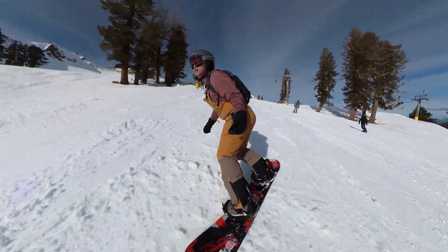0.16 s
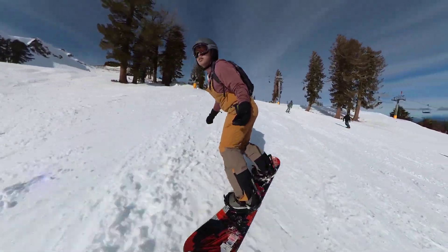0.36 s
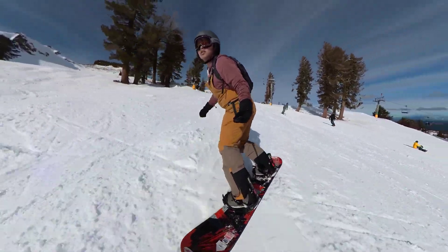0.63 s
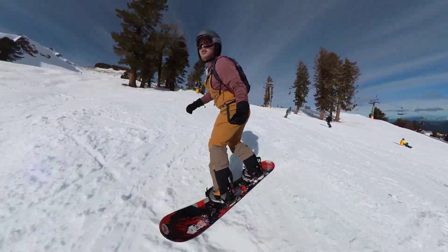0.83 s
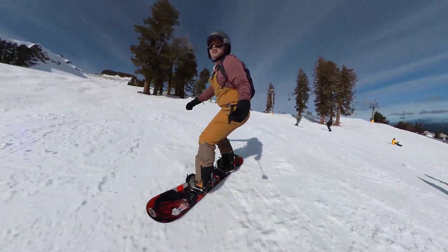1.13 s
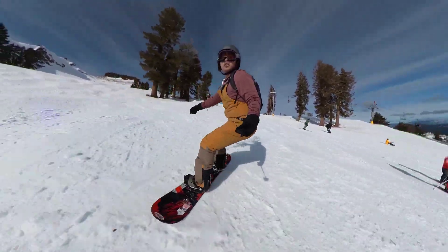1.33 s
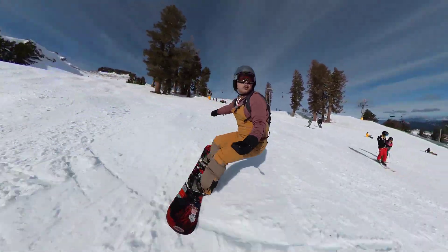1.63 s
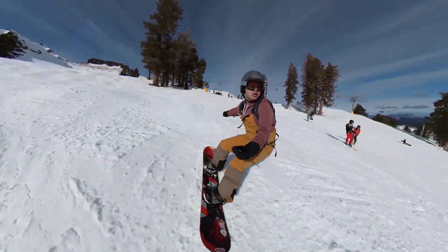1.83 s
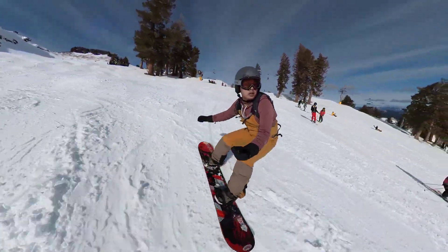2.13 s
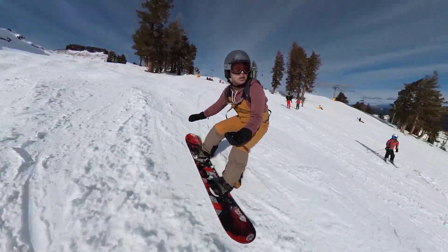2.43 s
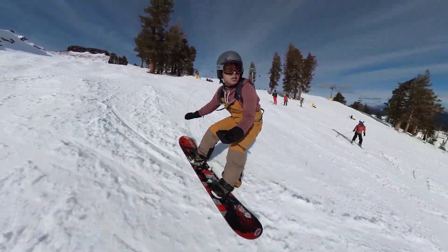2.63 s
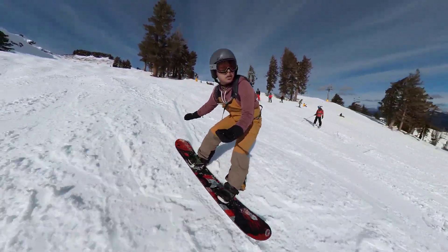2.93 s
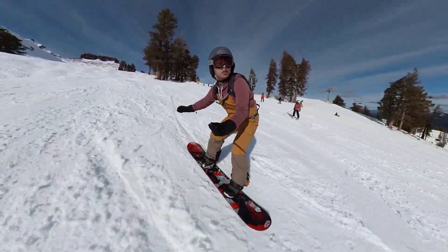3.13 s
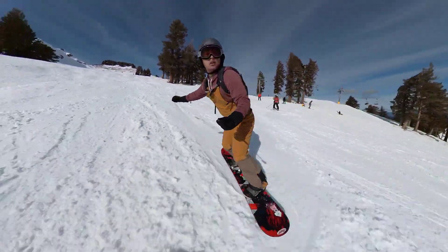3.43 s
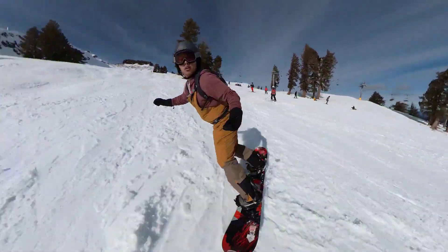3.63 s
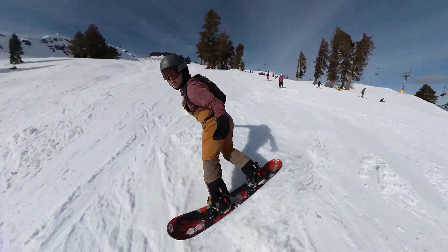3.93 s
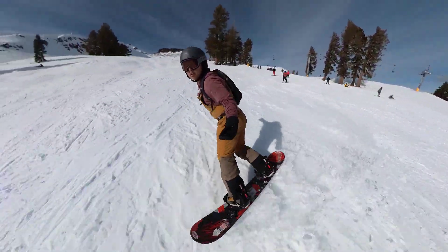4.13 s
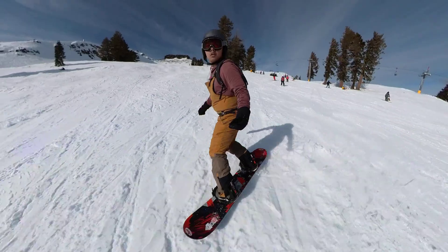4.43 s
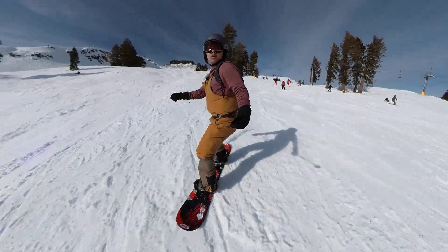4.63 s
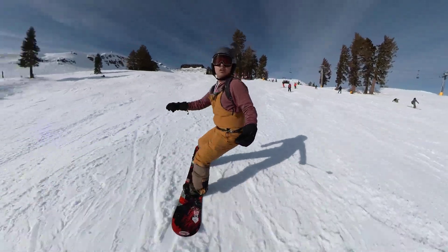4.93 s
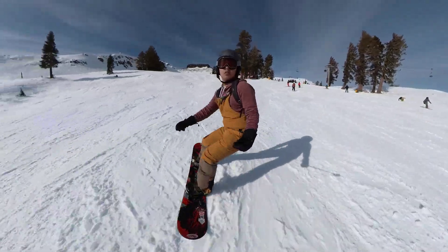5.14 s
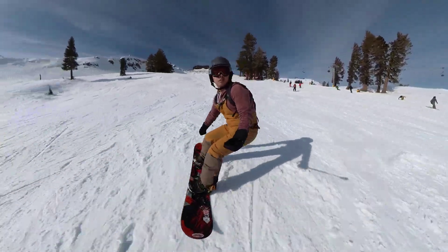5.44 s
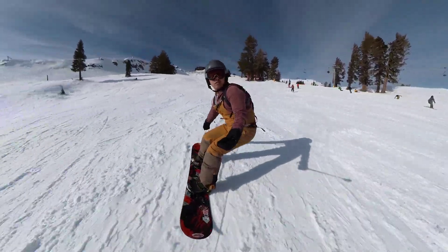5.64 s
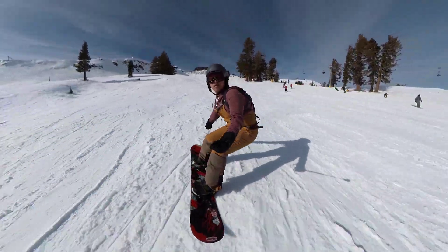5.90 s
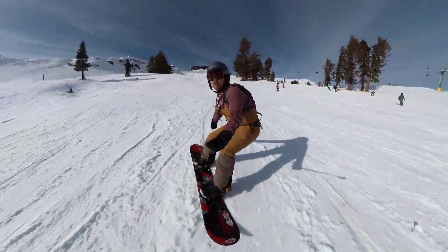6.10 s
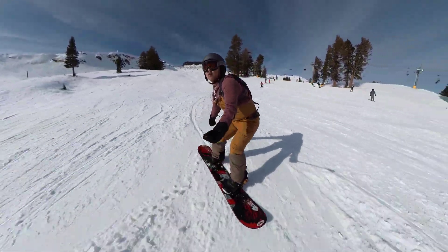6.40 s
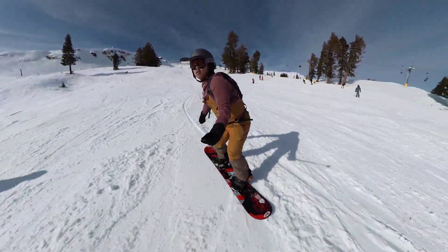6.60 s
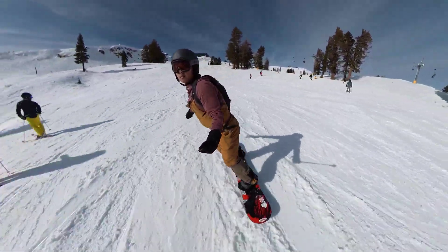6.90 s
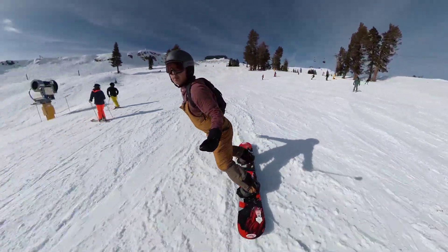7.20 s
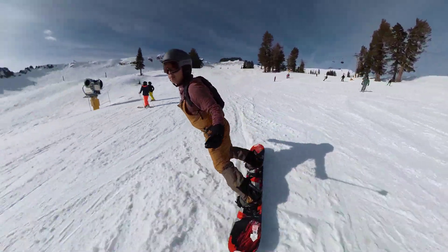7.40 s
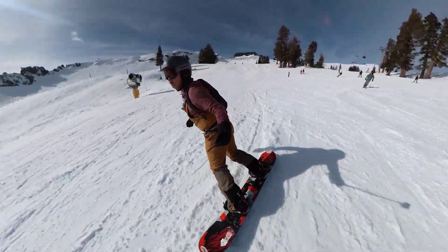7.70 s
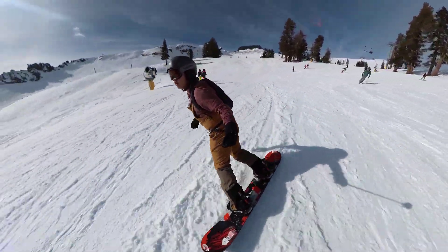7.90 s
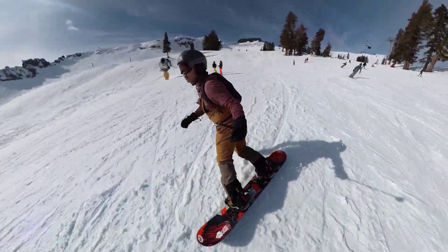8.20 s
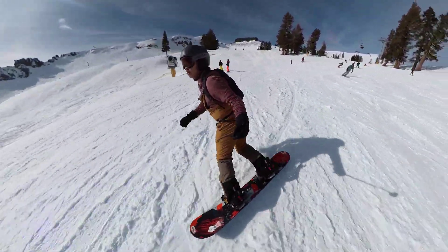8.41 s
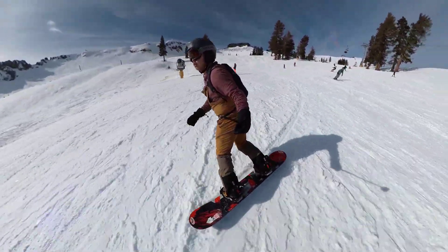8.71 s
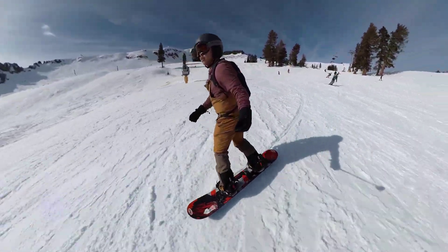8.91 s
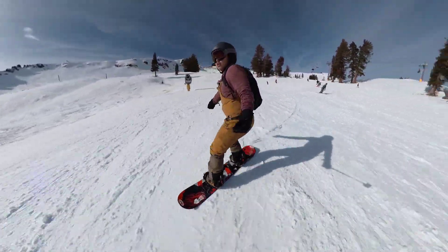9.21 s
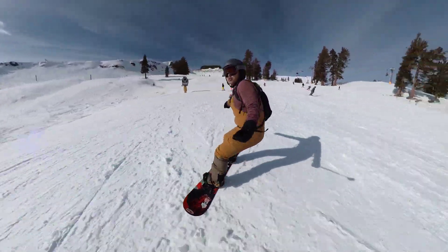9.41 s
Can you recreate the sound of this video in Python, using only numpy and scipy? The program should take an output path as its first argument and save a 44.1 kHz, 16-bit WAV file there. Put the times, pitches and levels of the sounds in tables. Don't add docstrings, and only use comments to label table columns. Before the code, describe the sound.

Bright icy hiss of a snowboard edge carving packed snow, with wind gusts buffeting a close microphone and a few small dull knocks.

```python
import sys
import numpy as np
from scipy import signal
from scipy.fft import rfft, irfft, next_fast_len
from scipy.io import wavfile
from scipy.ndimage import uniform_filter1d, minimum_filter1d

SR = 44100
rng = np.random.default_rng(int(sys.argv[2]) if len(sys.argv) > 2 else 0)


def makeup_ratio(level_db):
    decades = np.asarray(level_db, float) / 20
    return 10 ** decades


def generate_wav(signal):
    frames = np.transpose(np.atleast_2d(signal))
    scaled = np.clip(frames, -1, 1) * 32767
    pcm = np.round(scaled).astype(np.int16)
    wavfile.write(sys.argv[1], SR, pcm)


N = 421155
TIME = np.arange(N) / SR
CLOCK = np.arange(0, N / SR + .002, .001)
HZ = np.fft.rfftfreq(next_fast_len(N), 1 / SR)

# frequency in Hz, density in dB per Hz.
SCRAPE_COLOUR = [(1100, -7), (1800, 1.5), (3000, 0), (5000, 0.5), (8000, 0), (9500, -21.5), (16000, -48)]
LOW_PORT_COLOUR = [(7200, -30.5), (8800, -5), (10300, 2), (11100, 1.5), (12000, -12), (13000, -38)]
MID_PORT_COLOUR = [(10000, -28), (11400, 5.5), (12600, 6.5), (14000, -15)]
HIGH_PORT_COLOUR = [(11800, -22), (12800, 0), (13600, 9), (14500, 7), (15900, 9), (16000, -36)]

# time in seconds, pressure in dB, port gleam in dB,
# port facing the spray (0 low ring, 1 middle, 2 high, 3 low again), board drone in dB.
RIDE = [(0.1, -49.5, 14.2, 1.45, 2), (0.36, -47, 11, 2, -3.1), (1.2, -49.5, 11.5, 2.4, 4),
        (1.6, -48.5, 5.5, 3, 2), (2.3, -49, -2, 2.4, -4), (3.66, -55.5, 11.5, 1.3, -2.5),
        (3.97, -55, 9, 1.3, -2), (4.55, -45.5, 5.5, 1.4, -1), (4.72, -53, 5.5, 0.1, -2.5),
        (5.5, -48, 4, -.4, 3.5), (6.05, -43.5, 6.5, .7, -0.8), (6.33, -51, .5, -0.4, 3.5),
        (6.85, -57.5, 3.5, -.4, -3), (7.35, -51, 2, -0.6, 0), (7.98, -49.5, 7.4, 1, -1),
        (8.78, -47, 5, 1.7, 3.5), (9.1, -56.5, 10.5, 1.54, 6.5), (9.55, -56.5, 6, 1.3, 1)]
# start in seconds, hold in seconds, pressure in dB, gleam
# in dB, facing 0-3.
BITES = [(0.0, 0.033, -41, 6, 0.36), (2.55, 0.47, -54.5, 7.5, 1.2), (1.002, 0.072, -46, 14.5, 2.6),
         (1.19, 0.084, -56.5, 17.5, 2.3), (1.446, 0.066, -52.5, 17.5, 0.084), (1.689, 0.057, -43, -1, 1.6),
         (1.753, 0.13, -43.5, 9, 0.45), (2.12, 0.08, -46, -1, 2.7), (2.294, 0.055, -45, -20, 0.33),
         (2.57, 0.089, -48.5, -10, 1.4), (3.083, 0.051, -46.5, -21, 0.91), (3.7, 0.21, -57, 20.5, 1.7),
         (5.105, 0.036, -51.5, 12.5, 2.5), (5.226, 0.028, -49, 10, 2.7), (5.52, 0.12, -62, 15, 1.8),
         (7.0, 0.11, -57, -8, 2.9), (7.557, 0.23, -48, 5.5, 0.33), (7.77, 0.072, -47, 0.5, 0.27),
         (8.067, 0.039, -47, 4, 1.5), (8.376, 0.058, -46.5, -4, 1.6), (9.184, 0.097, -56.5, 9, 1.9),
         (6.2, .3, -58, 14, 2.1), (5.66, .28, -56, 15, 1.3), (3.82, .12, -56, 16, .5),
         (1.93, .02, -54, 11, 2.3), (1.97, .08, -62, 17, 2.1), (4.705, .015, -53, 6, .3),
         (4.81, .015, -49, 3, .1), (5.0, .07, -51, 2, .3), (5.36, .02, -54, 13, 1),
         (7.11, .14, -62, 13, 2.1), (6.44, .07, -55, -4, 2.5), (1.33, .02, -51, 10, 2.5),
         (1.25, .03, -58, 18, .4), (7.45, .45, -60, 14, 1.7), (6.67, .08, -60, 4, 2.9),
         (1.1, .06, -58, 17, 1.6)]
# start in seconds, hold in seconds, pressure in dB,
# gleam in dB, facing 0-3.
CARVES = [
    (.375, 0.09, -45, 9, 0.1),
    (.48, .29, -42.5, 11.5, .4),
    (.8, .16, -42.5, 10.5, .4),
    (3.975, .012, -54, 14, .9),
    (3.989, 0.04, -45, 12, 0),
    (4.04, .22, -43, 9.5, .1),
    (4.3, .2, -44, 6.5, .2),
    (4.52, .07, -49, 5, .1),
    (2.41, .14, -57, 9, 1.3),
    (3.67, .06, -62, 22, 1.8),
]
# time in seconds, peak in dB.
ICE_LUMPS = [(0.3531, -33), (1.068, -48), (1.4386, -39), (1.697, -37), (2.575, -38), (3.1268, -44),
             (3.9903, -38), (4.9082, -46), (5.1113, -43), (5.246, -38), (5.69, -36.5), (5.9828, -36),
             (7.2674, -37), (7.3756, -43), (7.5482, -37), (7.7258, -42), (8.0755, -36), (9.4805, -52)]
BITE_RISE_S, BITE_RISE_DB, BITE_FALL_DB_PER_S = 0.022, 30, 256
LUMP_DB, LUMP_HOLD_S, LUMP_GLEAM_DB, LUMP_FACING = -10, 0.004, -4, 0.91
# level in dB of the low, middle, high ring.
PORT_DB = [1, -1, 0]
OFF_PORT_DB = 8.5
DRONE_DB = [-22, -16, -10.5, -10]

# frequency in Hz, side level in dB, share of time apart 0-1.
WIDTH = [(2850, -8.5, .8), (6000, -2.5, 1), (8940, -1, 0.3), (10000, -3.5, 0.7), (11200, -10.5, .8),
         (13400, 0, .9), (16000, -21, 1)]
# start in seconds, end in seconds, low edge in Hz, high edge in Hz,
# share of time apart 0-1.
NARROW_SPELLS = [
    (.45, 1.2, 8300, 10400, 0),
    (1.3, 1.9, 9000, 12500, .5),
    (2.4, 3.7, 12800, 16000, .3),
    (3.7, 4.3, 9000, 12500, .3),
    (4.75, 5.4, 9600, 10700, .1),
    (5.25, 5.42, 8300, 11500, 0),
    (7.2, 7.7, 8300, 10500, .2),
]
MONO_BELOW_HZ = 2950

# frequency in Hz,
# density in dB per Hz.
RUMBLE_COLOUR = [(30, -42), (50, -12), (75, -2), (100, -1.5), (130, -1), (170, -1.5), (240, -24)]
FLUTTER_COLOUR = [(120, -0.5), (180, -0.5), (280, -1), (440, -12.5), (620, -19)]
RASP_COLOUR = [(320, -4), (460, 0.5), (650, 3.5), (880, -4), (1200, -12.5)]
WHISK_COLOUR = [(650, -26), (920, -6), (1400, -6.5), (1600, -14), (2400, -19), (3600, -34)]
LIGHT_AIR_COLOUR = [(55, -19.5), (88, -12.5), (100, -14), (109, -5.5), (120, -10.5), (145, -11.5),
                    (190, -18)]
LAYER_OCTAVES = np.array([[0], [1], [2.3], [3.3]])
# time in seconds, level in dB, pitch in octaves above the rumble.
BREEZE = [(0.0, -46.5, .8), (0.34, -43, 1.1), (0.38, -63, 0.6), (0.9, -78, 1.4), (1.46, -69, 0.62),
          (1.6, -53, 0.68), (2.05, -54.5, -0.0033), (4.0, -47.5, 0.48), (4.5, -44.5, 0.5),
          (4.66, -52, 0.24), (5.7, -53, 0), (6.5, -56.5, -.4), (6.9, -46, -.8), (7.65, -47, 0.39),
          (8.3, -47.5, 0.9), (8.9, -47, 0.8), (9.12, -46.5, 0.46), (9.55, -42.5, 0.15)]
# start in seconds, rise in seconds, hold in seconds, level in dB,
# pitch in octaves above the rumble.
GUSTS = [(2.03, 0.22, .085, -33.5, 1.7), (2.22, .03, .12, -38, 2), (2.3, .03, .07, -38, -.2),
         (2.361, .02, .12, -38, 1.16), (2.5, 0.028, 0.13, -33, 0.22), (2.606, 0.021, 0.35, -30.5, 0.55),
         (2.97, 0.015, 0.42, -36, -0.26), (3.159, 0.039, 0.54, -27.5, 0.6), (3.737, .02, 0.19, -30, 0.3),
         (3.905, 0.03, 0.035, -28.5, 2.8), (3.984, .02, 0.074, -40, 0), (4.18, .08, 0.18, -35, 0.88),
         (5.06, 0.038, 0.19, -35.5, 0.2), (5.4, 0.055, 0.19, -48.5, 1.7), (4.417, 0.018, 0.04, -41, .5),
         (4.53, .02, .09, -52, 3), (6.552, 0.027, 0.222, -45.5, -1.1), (6.82, 0.081, 0.44, -39.5, -0.18),
         (7.147, 0.1, 0.32, -32.5, 1.54), (7.748, .11, 0.071, -31, 2), (8.354, 0.025, .04, -48, 0.5),
         (6.03, 0.045, 0.21, -48.5, -.3), (9.294, 0.044, 0.072, -45.5, 1.45), (9.492, 0.048, .05, -44, 2.8),
         (2.278, 0.04, 0.052, -29.5, 3.5), (7.355, 0.022, 0.044, -30.5, 6),
         (1.486, 0.013, 0.019, -40, 0.95), (6.98, .05, .08, -53, 2.3), (9.3, .03, .06, -44, -.4),
         (.68, .02, .07, -58, -.3), (6.66, .05, .2, -54, .7), (5.3, .03, .17, -47, .2),
         (5.5, .03, .16, -50, -.3)]
# middle in seconds, peak in dB, pitch in octaves above the rumble.
PUFFS = [(3.78, -41, .6), (2.42, -34, 0.81), (2.445, -24.5, 0.21), (2.524, -29, .9), (2.645, -23.5, 0.14),
         (2.68, -33, .6), (2.78, -27, .8), (2.81, -20.5, 0.67), (2.85, -36, 0.81), (2.91, -30.5, 0.93),
         (2.965, -31, 0.64), (3.14, -26, 0.93), (3.22, -21, 0.34), (3.32, -37, .1), (3.35, -31, 1.7),
         (3.43, -27, 0.28), (3.48, -31, 0.5), (3.54, -24, 0.4), (3.635, -20.5, 1.3), (3.69, -29, .1),
         (3.721, -23, .9), (3.901, -21.5, 0.33), (4.26, -30, 1.1), (4.31, -24.5, 0.73), (5.17, -44, .4),
         (5.25, -36, 0.87), (7.289, -30, 3.5), (7.385, -28, 3.1), (7.45, -20, 0.27), (7.513, -30, 3),
         (3.3, -25, .2), (3.26, -28, .5), (3.375, -27, .3), (3.61, -30, 1.5), (3.098, -30, .2),
         (7.425, -30, 2), (7.48, -27, .5), (7.525, -27, .5), (7.24, -30, .8)]
GUST_RISE_DB, GUST_FALL_DB_PER_S, PUFF_SLOPE_DB_PER_S = 21.5, 1200, 692
BELOW_DB_PER_OCTAVE, ABOVE_DB_PER_OCTAVE = 5.5, 8.5
WEAK_FROM_DB, WEAK_STEEPER, DEEP_STEEPER = -34, 0.14, 5.9

# time in seconds, peak in dB, pitch in Hz.
EARLY_EDDIES = [(2.202, -26, 624), (2.229, -31, 875), (2.246, -27, 668), (2.274, -23, 738),
                (2.311, -19, 945), (2.336, -19, 571), (2.369, -22, 703), (2.436, -36, 401),
                (2.513, -32, 401), (2.522, -28, 493), (2.544, -36, 401), (2.571, -39, 799),
                (2.605, -38, 401), (2.622, -35, 463), (2.635, -32, 493), (2.663, -31, 401),
                (2.724, -33, 444), (2.751, -31, 401), (2.776, -26, 541), (2.799, -26, 476),
                (2.844, -29, 401), (2.869, -36, 401), (2.882, -32, 678), (2.897, -31, 431),
                (2.95, -33, 514), (3.093, -39, 541), (3.122, -32, 401), (3.145, -30, 401), (3.17, -37, 428),
                (3.196, -25, 727), (3.247, -31, 708), (3.288, -30, 428), (3.322, -27, 689),
                (3.349, -22, 773), (3.374, -31, 544), (3.394, -31, 487), (3.466, -32, 560),
                (3.478, -27, 487), (3.512, -28, 584), (3.53, -29, 406), (3.581, -33, 417),
                (3.593, -30, 506), (3.606, -27, 412), (3.646, -26, 452), (3.713, -26, 401),
                (3.743, -37, 404), (3.78, -31, 452), (3.823, -33, 428), (3.857, -36, 441),
                (3.884, -33, 420), (3.904, -28, 401), (3.919, -22, 587), (3.929, -19, 619)]
LATE_EDDIES = [(7.192, -34, 638), (7.237, -33, 493), (7.25, -34, 436), (7.263, -32, 401), (7.272, -28, 401),
               (7.284, -22, 872), (7.298, -27, 608), (7.314, -28, 498), (7.327, -27, 657),
               (7.338, -32, 404), (7.358, -23, 713), (7.371, -20, 719), (7.378, -22, 533),
               (7.392, -22, 401), (7.402, -24, 458), (7.42, -24, 444), (7.451, -25, 918), (7.46, -27, 412),
               (7.477, -27, 401), (7.493, -28, 495), (7.508, -33, 401), (7.508, -19, 404),
               (7.544, -32, 576), (7.561, -29, 624), (7.57, -32, 401), (7.577, -32, 592)]
STRAY_EDDIES = [(1.497, -29, 401), (2.296, -19, 800), (2.352, -19, 900), (4.257, -19, 471),
                (5.165, -18.5, 412), (5.252, -16.5, 450), (4.453, -26, 170), (4.47, -23, 150),
                (4.514, -31, 200), (4.544, -31, 420), (4.579, -31, 170), (4.605, -31, 150)]
EDDY_KICK, EDDY_KICK_S, EDDY_LULL, EDDY_LULL_S = 2.0, .0045, 1.4, .005
EDDY_FAINT_DB, EDDY_SPAN_DB, SPIT_DEPTH = -38, 13, .6

# time in seconds, peak in dB, ring in Hz, t60 in seconds.
KNOCKS = [
    (1.274, -28, 1240, 0.0098),
    (5.247, -27, 1020, 0.0097),
    (8.0874, -40, 2620, 0.014),
    (9.09, -31, 1110, 0.0089),
    (9.22, -34, 1520, 0.01),
    (9.4815, -28, 4590, 0.0088),
    (9.5394, -30, 1140, 0.0093),
]

# start in seconds, length in seconds, from Hz, to Hz, level in dB.
WHISTLES = [
    (3.918, .06, 600, 1300, -32),
    (7.81, .125, 420, 800, -36),
]
WHISTLE_WAVER, WHISTLE_RISE_SHARE, WHISTLE_END_S = .18, .6, .006

# start in seconds, hold in seconds, level in dB.
HUMS = [
    (8.082, .17, -47),
    (8.36, .06, -45),
    (8.733, 0.23, -41.5),
    (9.065, .13, -42.5),
]
# frequency in Hz, density in dB per Hz.
HOUSING_COLOUR = [(90, -24), (104, -6), (113, 0), (130, -22)]
HUM_RISE_S, HUM_RISE_DB, HUM_FALL_DB_PER_S = 0.023, 16, 500

DUCK_FROM_DB, DUCK_SHARE, DUCK_S = -32, 0.16, 0.027
LIMIT_PEAK = 0.14


def unit(x):
    return x / np.sqrt(np.mean(x ** 2))


def smooth_twice(x, first, second=None):
    return uniform_filter1d(uniform_filter1d(x, first), second or first)


def curves(table):
    s, *columns = np.transpose(table)
    return [np.interp(CLOCK, s, column) for column in columns]


def per_sample(levels_db):
    return np.array([np.interp(TIME, CLOCK, db) for db in levels_db])


def summed(levels_db):
    return 10 * np.log10(sum(makeup_ratio(2 * db) for db in levels_db) + 1e-12)


def swell(start_s, rise_s, hold_s, rise_db, fall_db_per_s):
    t = CLOCK - start_s - rise_s
    rise = np.minimum(0, rise_db * t / max(rise_s, .002))
    return rise - fall_db_per_s * np.maximum(t - hold_s, 0)


def colour(x, points):
    hz, db = np.transpose(points)
    gain = makeup_ratio(np.interp(np.log(HZ + 1), np.log(hz), db, left=-90, right=-90))
    return unit(irfft(rfft(x, next_fast_len(N)) * gain)[:N])


def steadied(x, span_s):
    power = smooth_twice(x ** 2, int(span_s * SR))
    return unit(x / np.sqrt(power + .02))


def walk(rate_hz):
    hold = max(int(SR / rate_hz), 2)
    steps = np.repeat(rng.standard_normal(N // hold + 1), hold)
    return unit(smooth_twice(steps, hold)[:N])


def flicker(depth_db, rate_hz):
    return makeup_ratio(depth_db * walk(rate_hz) - depth_db ** 2 * np.log(10) / 20)


def rings(events, t60_s, noisy):
    length = 4096
    out, t = np.zeros(N + length), np.arange(length) / SR
    rough = rng.standard_normal((len(events), length))
    for (s, db, hz), decay_s, noise in zip(events, t60_s, rough):
        dull = max(int(SR / hz / 3), 1)
        wave = np.sin(2 * np.pi * hz * t) + noisy * unit(smooth_twice(noise, dull))
        envelope = np.exp(-t * np.log(1000) / decay_s) * np.minimum(t / 0.0015, 1)
        i = int(s * SR)
        out[i:i + length] += makeup_ratio(db) * wave * envelope
    return out[:N]


def port_shares(gleam_db, facing):
    turned = np.abs((np.arange(3)[:, None] - facing + 3 / 2) % 3 - 3 / 2)
    ports_db = np.array(PORT_DB)[:, None] + gleam_db - OFF_PORT_DB * turned
    return makeup_ratio(2 * np.vstack([0 * ports_db[:1], ports_db]))


def pressure():
    ride_db, gleam_db, facing, drone_db = curves(RIDE)
    lumps = [(s, LUMP_HOLD_S, db + LUMP_DB, LUMP_GLEAM_DB, LUMP_FACING) for s, db in ICE_LUMPS]
    rows = BITES + CARVES + lumps
    bites_db = [db + swell(s - BITE_RISE_S, BITE_RISE_S, hold_s, BITE_RISE_DB, BITE_FALL_DB_PER_S)
                for s, hold_s, db, _, _ in rows]
    power = np.hstack([port_shares(*row[3:]) for row in rows]) @ makeup_ratio(2 * np.array(bites_db))
    power = power + port_shares(gleam_db, facing) * makeup_ratio(2 * ride_db)
    edge_db = 10 * np.log10(power)
    return edge_db, edge_db[0] + drone_db + np.array(DRONE_DB)[:, None]


def grains(spread_db):
    return rng.standard_normal(N) * makeup_ratio(spread_db * rng.exponential(size=N))


def edge(levels_db):
    chatter = flicker(1.0, 9) * flicker(1.0, 70) * flicker(0.73, 400)
    colours = (SCRAPE_COLOUR, LOW_PORT_COLOUR, MID_PORT_COLOUR, HIGH_PORT_COLOUR)
    sprays = []
    for spray in (grains(0.86), grains(0.84)):
        layers = [makeup_ratio(db) * colour(spray, points) for db, points in zip(levels_db, colours)]
        sprays.append(chatter * sum(layers))
    return sprays


def apart(hiss, spray):
    hz, side_db, share = np.transpose(WIDTH)
    step, bands = 1024, 22
    frames_s = np.arange(N // step + 1) * step / SR
    edges_hz = MONO_BELOW_HZ + np.cumsum(np.r_[0, np.linspace(350, 840, num=bands)])
    bins = rfft([hiss, spray], next_fast_len(N))
    mid = flicker(.9, 11) * irfft(bins[0] * (HZ < MONO_BELOW_HZ))[:N]
    side = 0
    moods = rng.standard_normal((bands, len(frames_s)))
    moods = uniform_filter1d(uniform_filter1d(moods, size=3), size=2, axis=0)
    patches = rng.standard_normal((bands, len(frames_s)))
    patches = uniform_filter1d(uniform_filter1d(patches, size=4), size=3, axis=0)
    for lo, hi, mood, patch in zip(edges_hz[:-1], edges_hz[1:], moods, patches):
        chance = np.full(len(frames_s), np.interp(lo, hz, share))
        for start_s, end_s, from_hz, to_hz, rare in NARROW_SPELLS:
            chance[(frames_s >= start_s) & (frames_s < end_s) & (from_hz <= lo < to_hz)] = rare
        on = np.argsort(np.argsort(mood)) < chance * len(frames_s)
        band = irfft(bins * ((HZ >= lo) & (HZ < hi)))[:, :N]
        band = makeup_ratio(np.interp(TIME, frames_s, 2.4 * patch)) * band
        mid = mid + band[0]
        side = side + makeup_ratio(np.interp(lo, hz, side_db)) * np.interp(TIME, frames_s, on) * band[1]
    return mid, side


def tilt(db, octave):
    off = LAYER_OCTAVES - np.maximum(octave, 0)
    weak = WEAK_STEEPER * np.maximum(WEAK_FROM_DB - db, 0)
    deep = DEEP_STEEPER * np.maximum(-octave, 0)
    above = ABOVE_DB_PER_OCTAVE + weak + deep
    return db + np.where(off > 0, -above, BELOW_DB_PER_OCTAVE) * off


def airflow():
    shapes_db = [swell(s, rise_s, hold_s, GUST_RISE_DB, GUST_FALL_DB_PER_S)
                 for s, rise_s, hold_s, _, _ in GUSTS]
    shapes_db += [-PUFF_SLOPE_DB_PER_S * np.abs(CLOCK - row[0]) for row in PUFFS]
    tops_db = np.hstack([tilt(*row[-2:]) for row in GUSTS + PUFFS])
    gust_power = makeup_ratio(2 * tops_db) @ makeup_ratio(2 * np.array(shapes_db))
    return 10 * np.log10(gust_power + makeup_ratio(2 * tilt(*curves(BREEZE))))


def kicks():
    out, half = np.zeros(N), 1024
    t = np.arange(-half, half) / SR
    wave = np.where(t >= 0, EDDY_KICK * np.exp(-t / EDDY_KICK_S), -EDDY_LULL * np.exp(t / EDDY_LULL_S))
    for s, db, _ in EARLY_EDDIES + LATE_EDDIES + STRAY_EDDIES:
        i = int(s * SR)
        out[i - half:i + half] += wave * np.clip((db - EDDY_FAINT_DB) / EDDY_SPAN_DB, .3, 1.5)
    return out


def wind(rumble_db, flutter_db, rasp_db, whisk_db):
    ragged = np.clip((np.maximum(flutter_db, rasp_db) + 56.0) / 16, 0, 1)
    ragged = ragged * np.clip((rumble_db - rasp_db + 16.5) / 18, .7, 1)
    air, lurch, spit = rng.standard_normal(N), walk(45), SPIT_DEPTH * walk(330)
    heave = rng.standard_normal(N)
    calm = np.clip((-39.5 - rumble_db) / 6, 0, 1)
    rumble = calm * colour(heave, LIGHT_AIR_COLOUR) + (1 - calm) * colour(heave, RUMBLE_COLOUR)
    out = makeup_ratio(rumble_db) * steadied(rumble, 0.21)
    kick = kicks()
    for db, points, lurch_db, spit_db in ((flutter_db, FLUTTER_COLOUR, 1.6, 6.5),
                                          (rasp_db, RASP_COLOUR, 1.7, 7.5),
                                          (whisk_db, WHISK_COLOUR, 1.8, 6.8)):
        bursts = steadied(air * makeup_ratio(ragged * spit_db * spit), 0.013)
        bursts = bursts * makeup_ratio(ragged * spit_db * kick)
        level = makeup_ratio(db + ragged * lurch_db * lurch) * flicker(0.72, 11)
        out = out + level * steadied(colour(bursts, points), 0.068)
    return out


def eddies():
    events = np.array(EARLY_EDDIES + LATE_EDDIES + STRAY_EDDIES)
    return makeup_ratio(3.0) * rings(events, 3.5 / events[:, 2], .9)


def knocks():
    events = np.array(KNOCKS)
    return makeup_ratio(0.5) * rings(events[:, :3], np.maximum(events[:, 3], .003), 0.9)


def whistles():
    out, waver, puff = np.zeros(N), walk(260), flicker(3.0, 150)
    for s, length_s, from_hz, to_hz, db in WHISTLES:
        along = np.clip((TIME - s) / length_s, 0, 1)
        hz = from_hz * (to_hz / from_hz) ** np.sqrt(along) * (1 + WHISTLE_WAVER * waver)
        rise = np.minimum(along / WHISTLE_RISE_SHARE, 1)
        end = np.clip((s + length_s - TIME) / WHISTLE_END_S, 0, 1)
        tone = np.sqrt(2) * np.sin(2 * np.pi * np.cumsum(hz) / SR)
        out += makeup_ratio(db) * rise * end * puff * tone
    return out


def housing():
    level_db = summed([db + swell(s, HUM_RISE_S, hold_s, HUM_RISE_DB, HUM_FALL_DB_PER_S)
                       for s, hold_s, db in HUMS])
    hum = steadied(colour(rng.standard_normal(N), HOUSING_COLOUR), .08)
    return makeup_ratio(per_sample([level_db])[0]) * hum


def scene():
    air_db = airflow()
    edge_db, drone_db = pressure()
    over_db = np.maximum(summed(air_db) - DUCK_FROM_DB, 0)
    over_db = uniform_filter1d(over_db, int(DUCK_S * 1000) + 1)
    hiss, side = apart(*edge(per_sample(edge_db - DUCK_SHARE * over_db)))
    lows_db = summed([air_db, drone_db])
    mid = hiss + wind(*per_sample(lows_db)) + eddies() + knocks() + whistles() + housing()
    return np.array([mid + side, mid - side])


def low_pass(x):
    return signal.sosfilt(signal.butter(12, 16890, fs=SR, output="sos"), x)


def record(dry):
    bass_cut = signal.butter(3, 62, "high", fs=SR, output="sos")
    top_cut = signal.ellip(12, .3, 70, 15760, fs=SR, output="sos")
    cut = signal.sosfilt(top_cut, signal.sosfilt(bass_cut, dry))
    room = np.minimum(LIMIT_PEAK / (np.abs(cut).max(axis=0) + 1e-9), 1)
    gain = uniform_filter1d(minimum_filter1d(room, size=128), size=96)
    return low_pass(cut * gain)


dry = scene()
out = record(dry)
generate_wav(out)
```